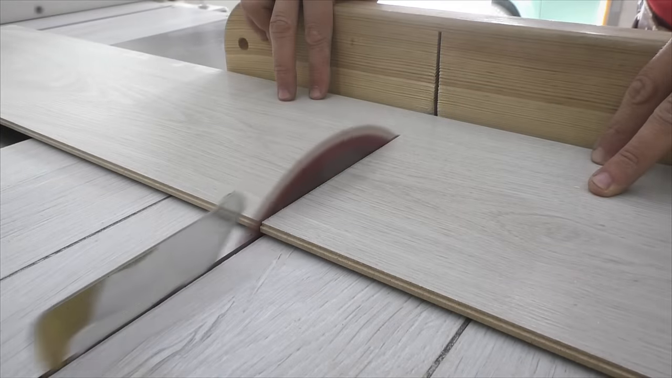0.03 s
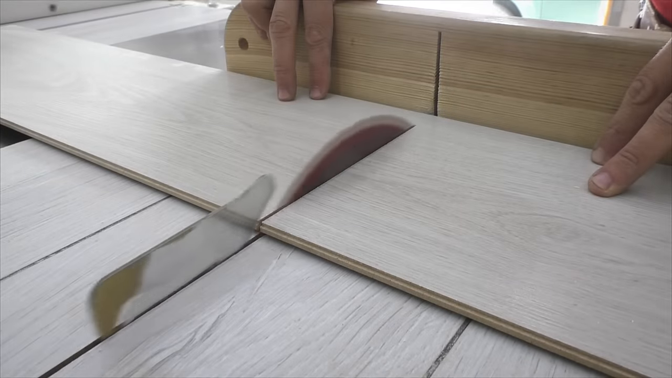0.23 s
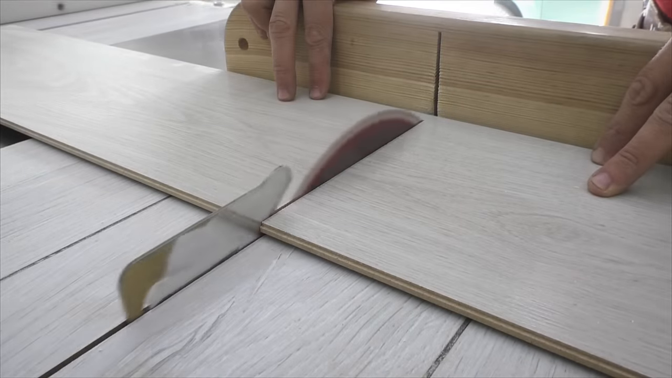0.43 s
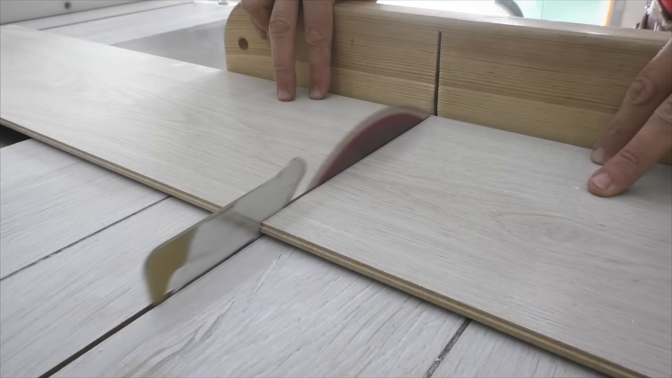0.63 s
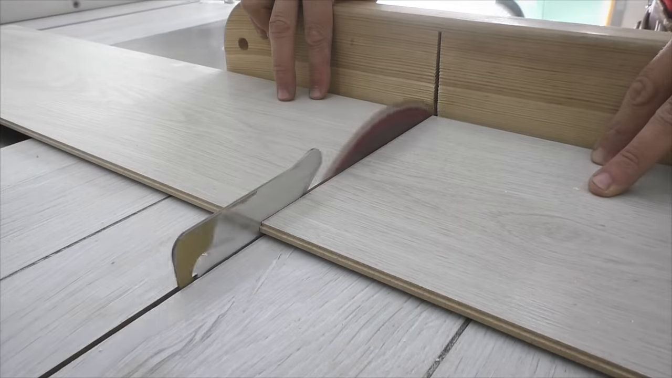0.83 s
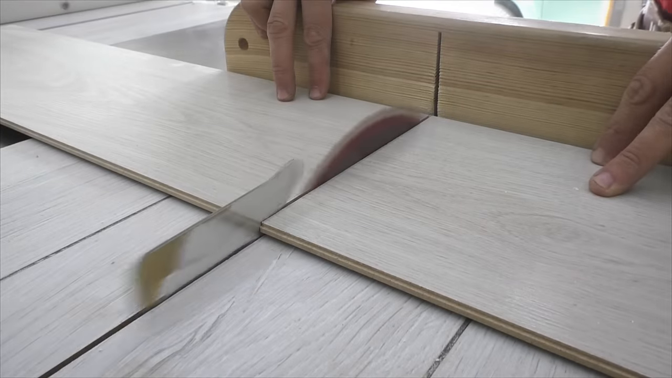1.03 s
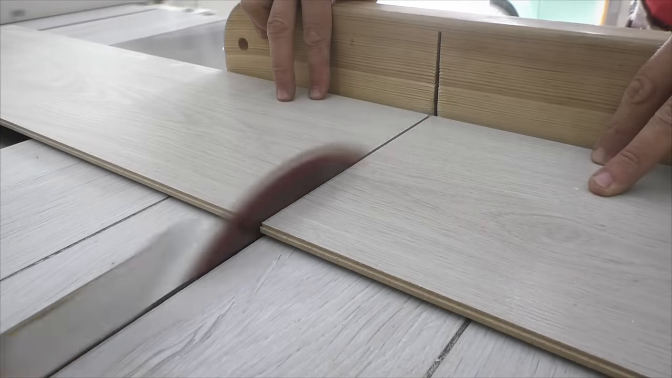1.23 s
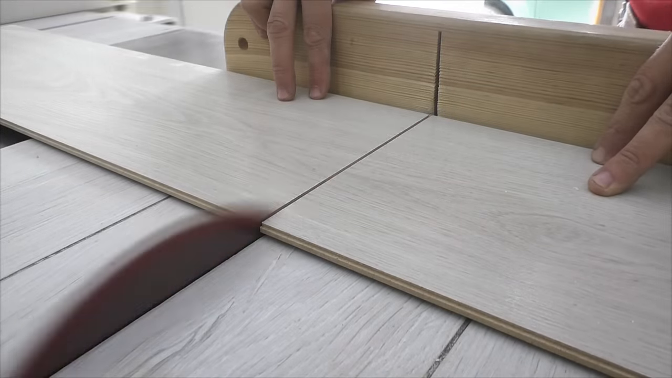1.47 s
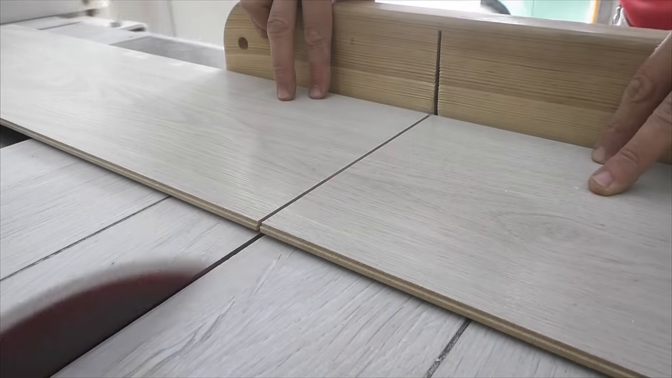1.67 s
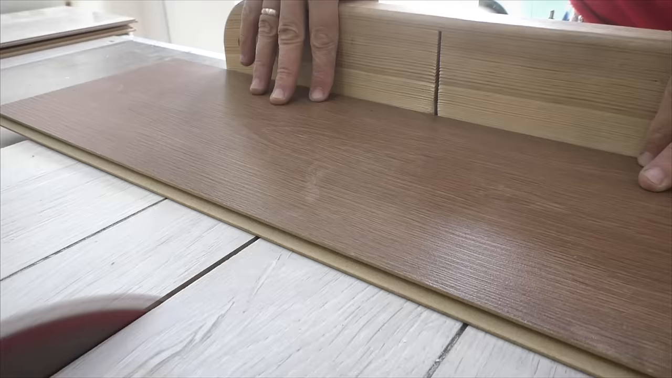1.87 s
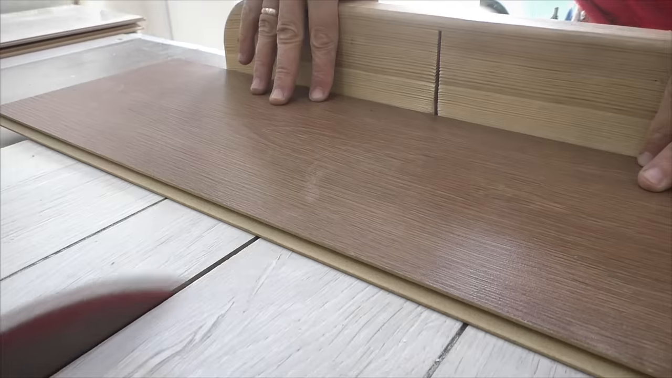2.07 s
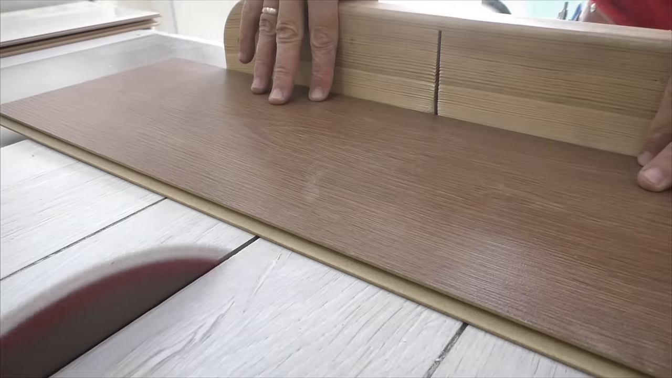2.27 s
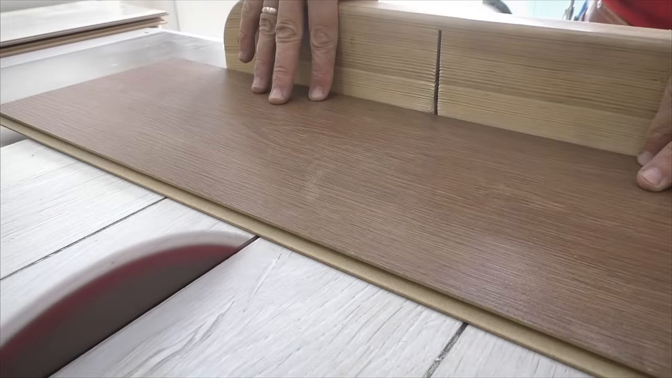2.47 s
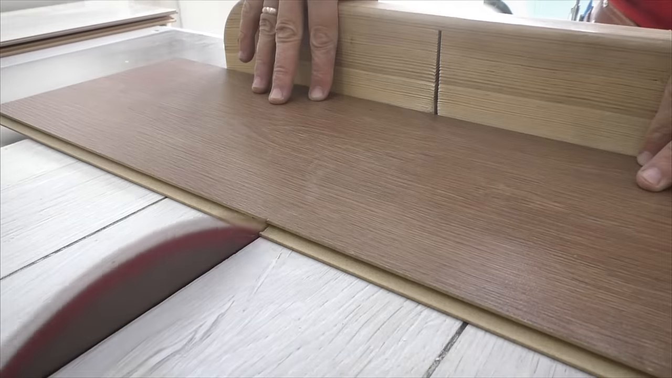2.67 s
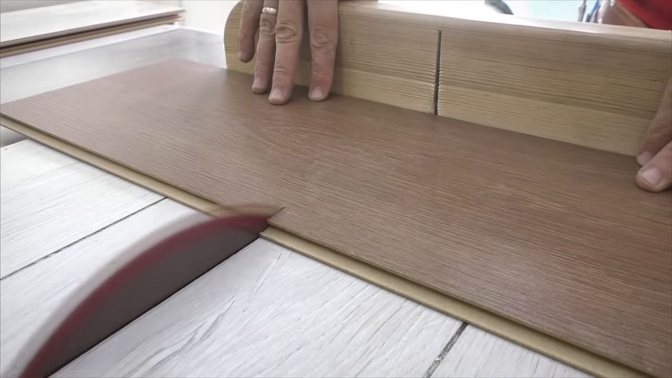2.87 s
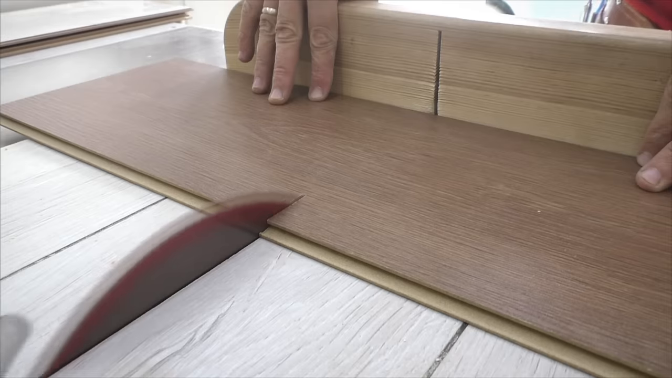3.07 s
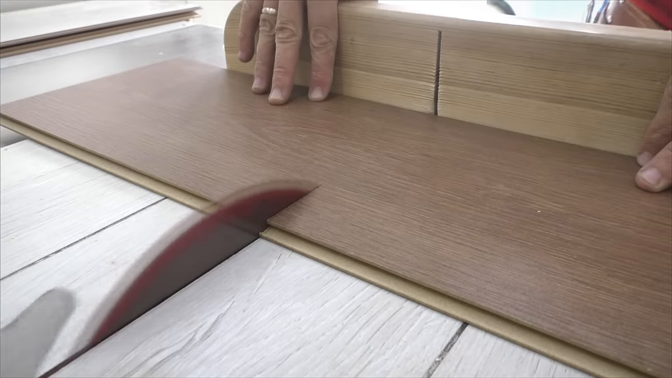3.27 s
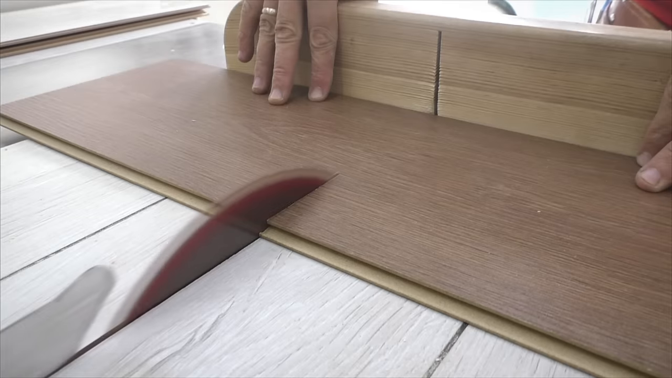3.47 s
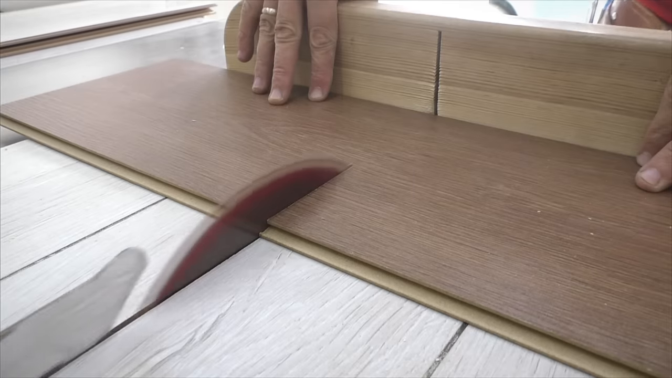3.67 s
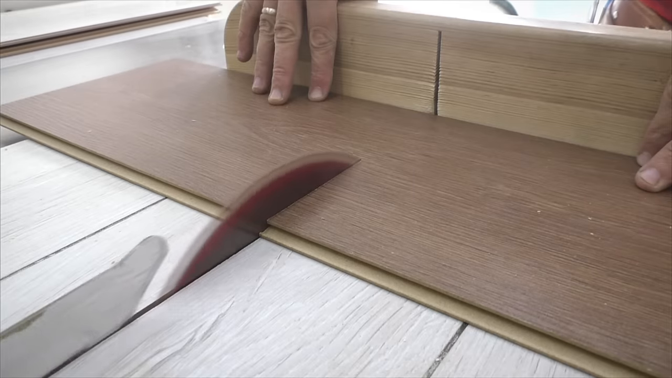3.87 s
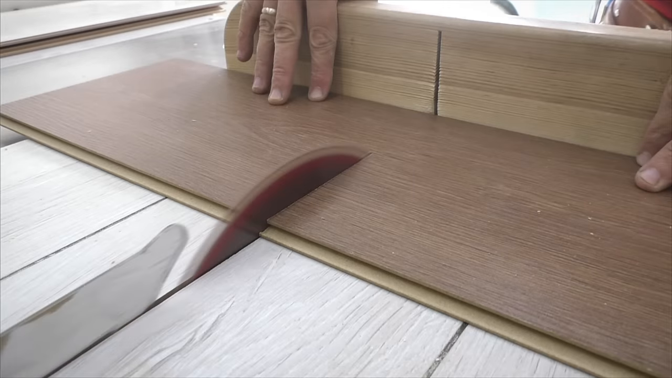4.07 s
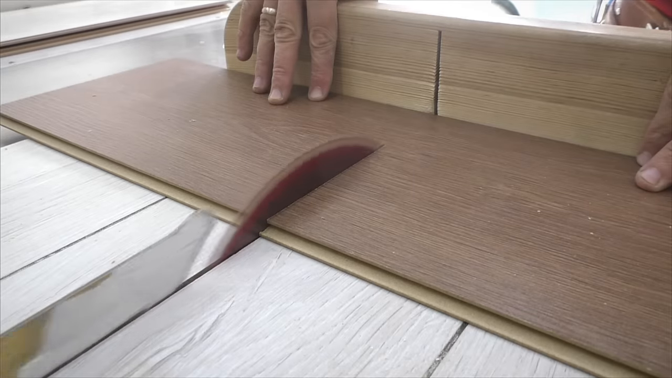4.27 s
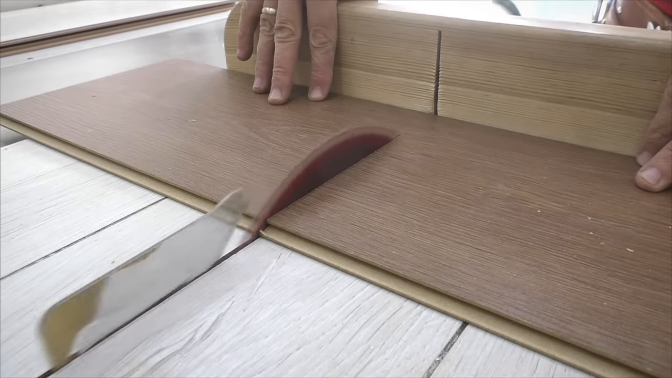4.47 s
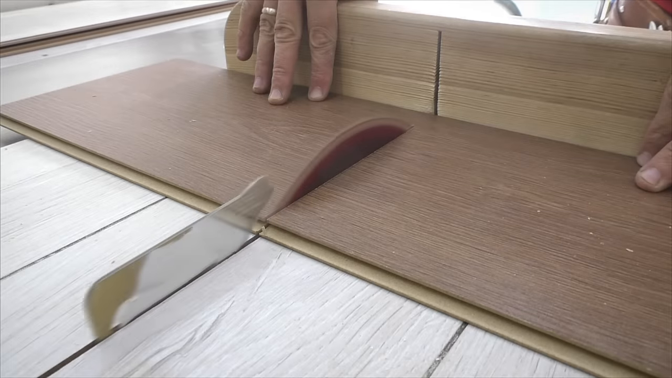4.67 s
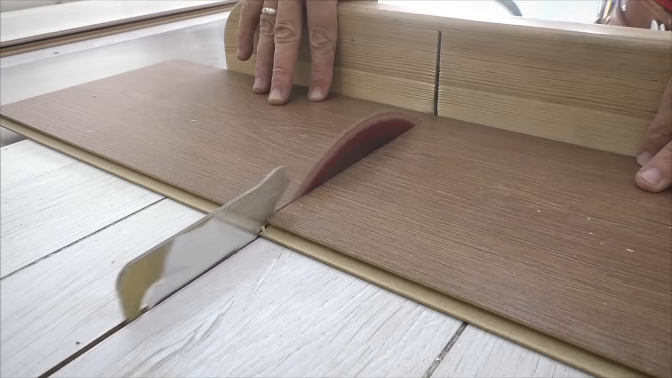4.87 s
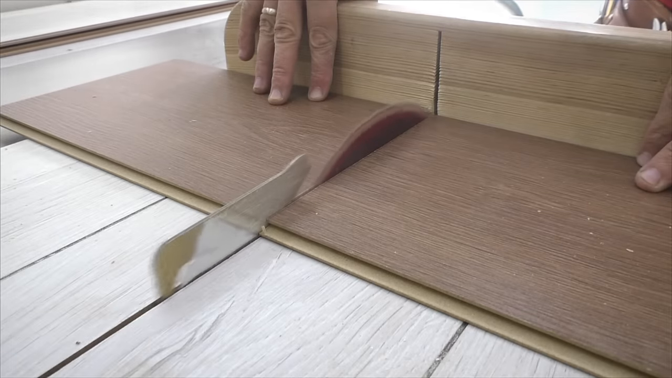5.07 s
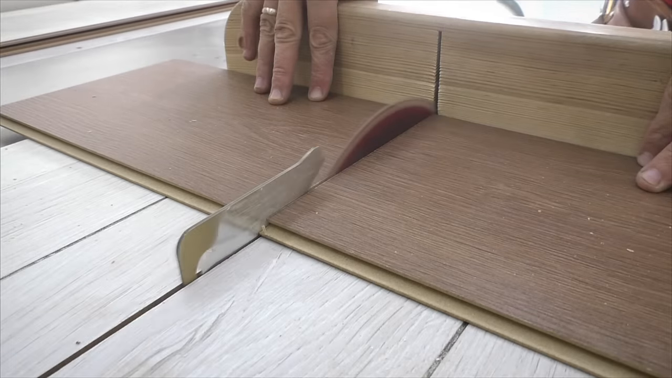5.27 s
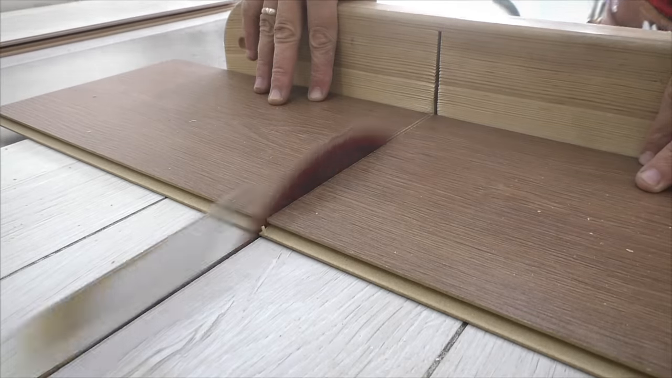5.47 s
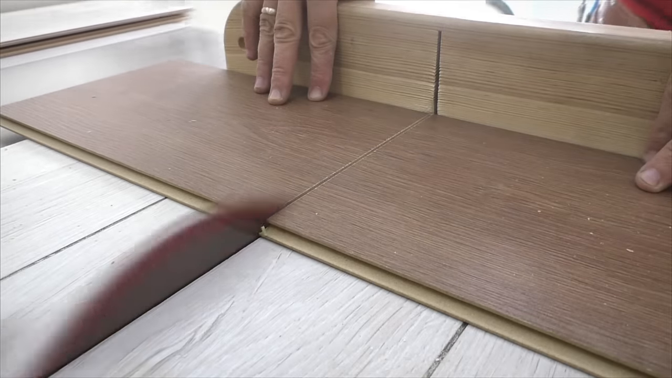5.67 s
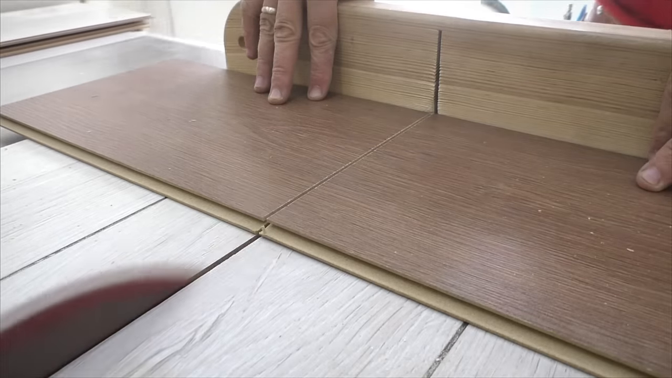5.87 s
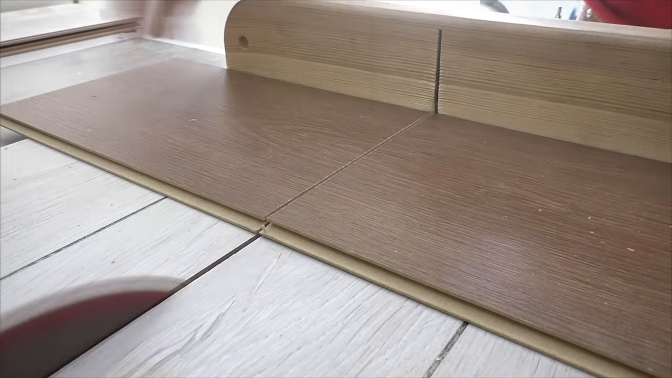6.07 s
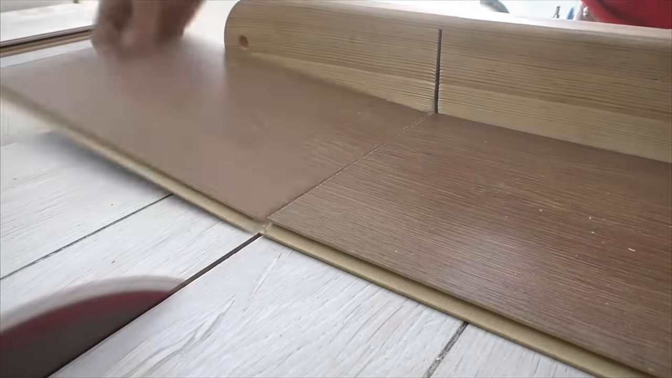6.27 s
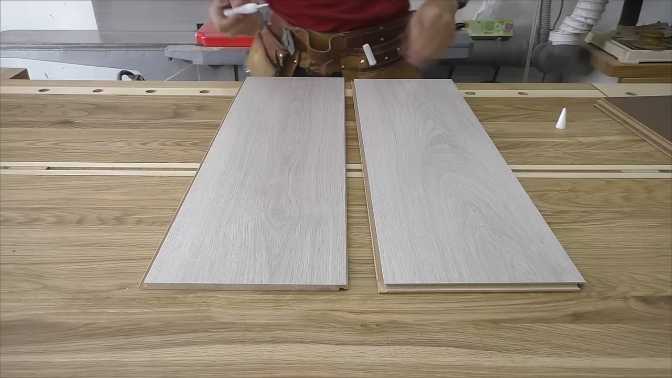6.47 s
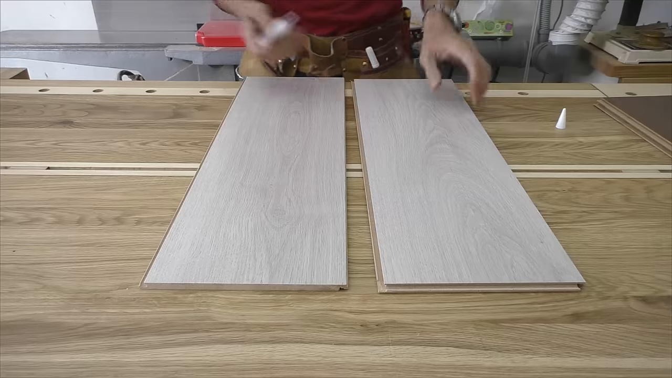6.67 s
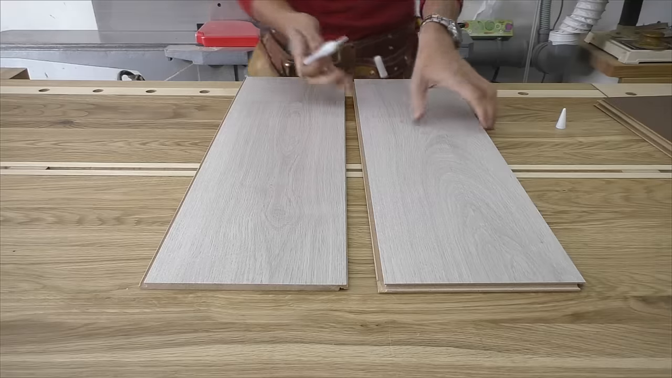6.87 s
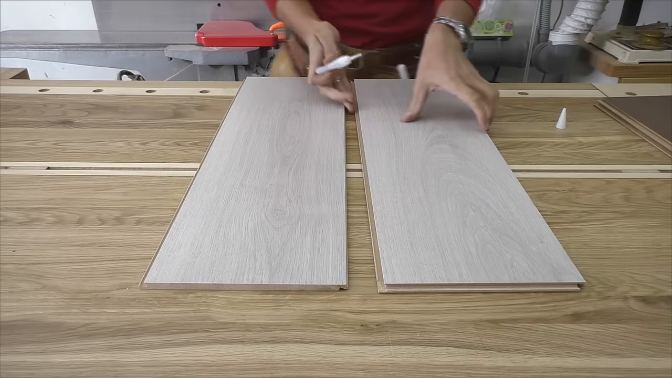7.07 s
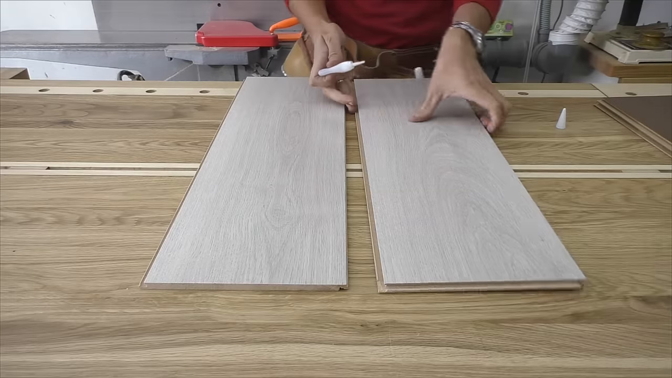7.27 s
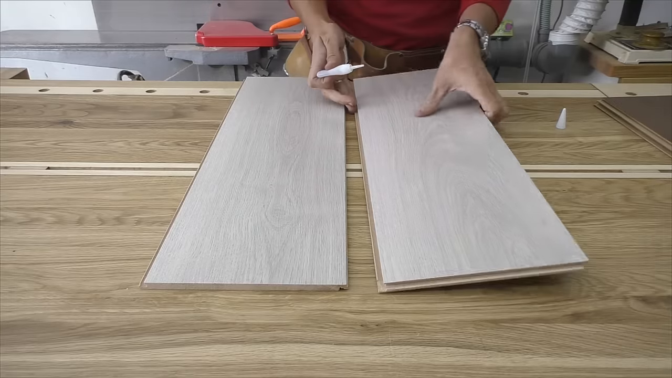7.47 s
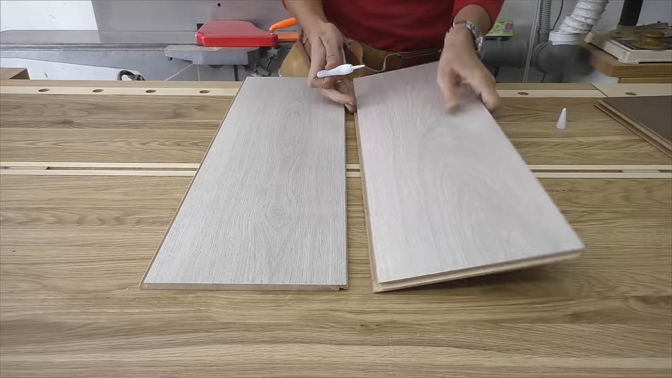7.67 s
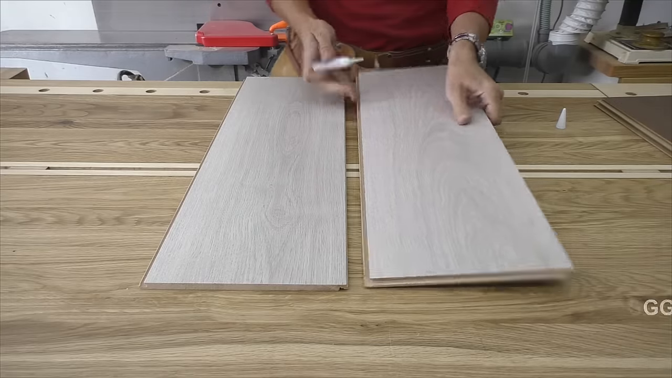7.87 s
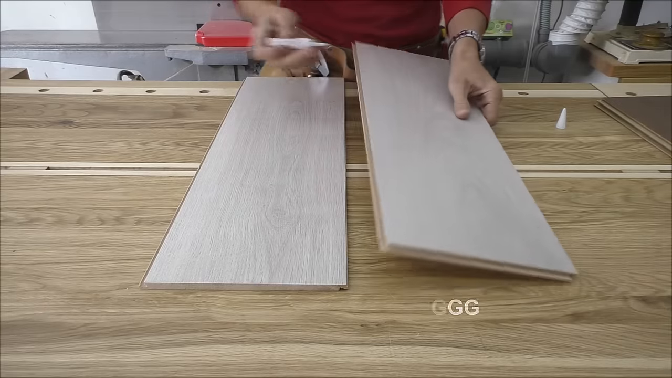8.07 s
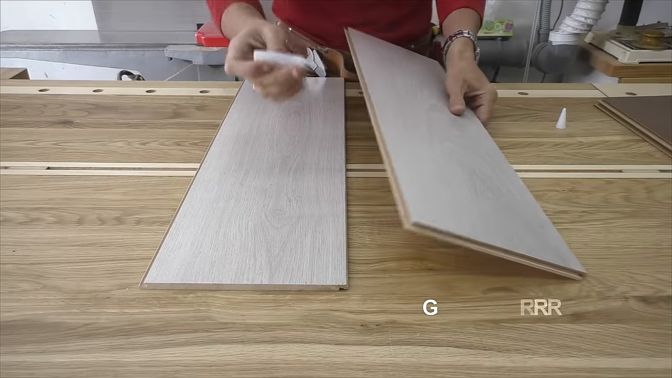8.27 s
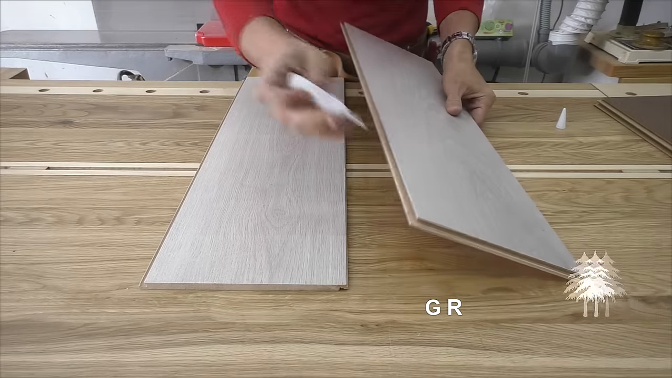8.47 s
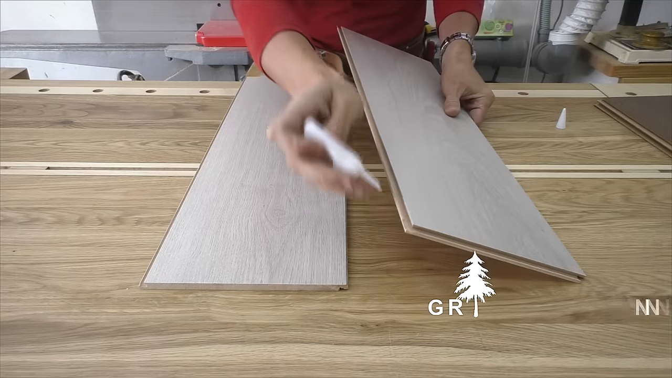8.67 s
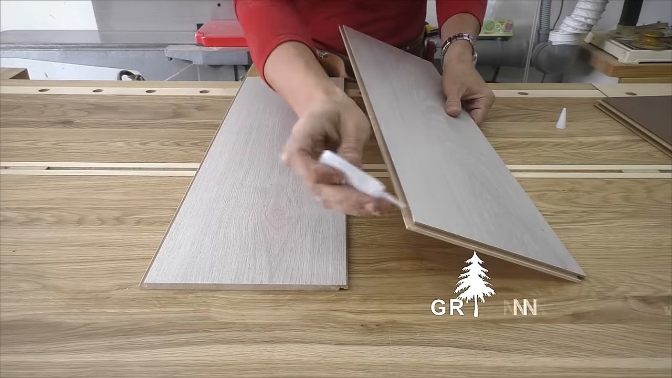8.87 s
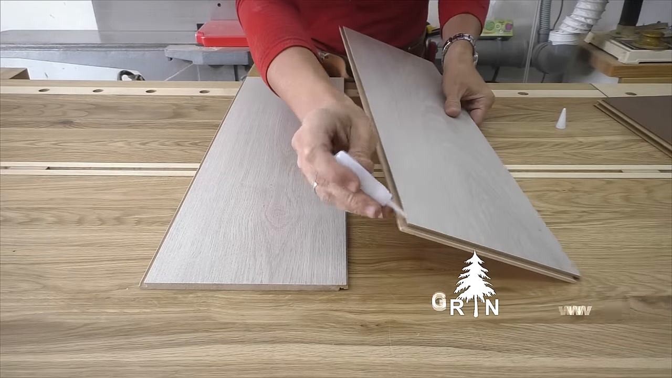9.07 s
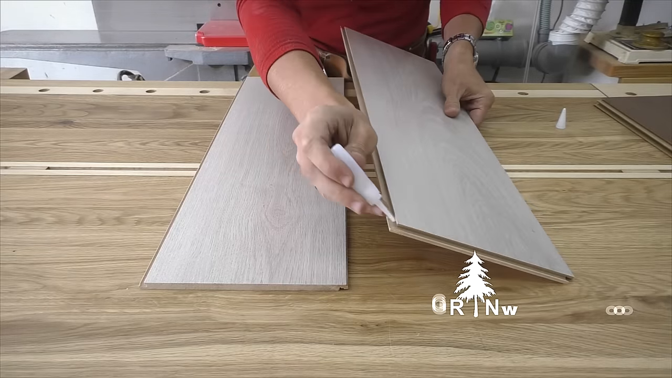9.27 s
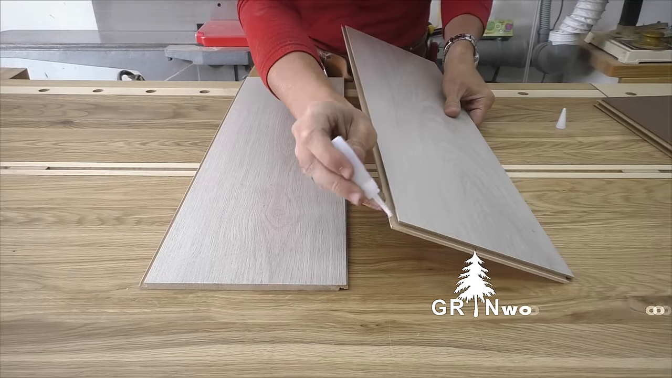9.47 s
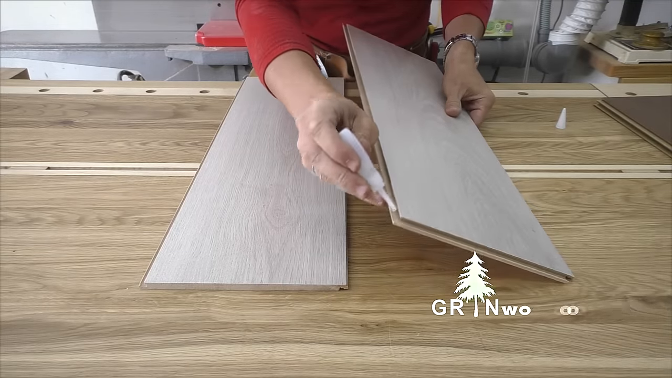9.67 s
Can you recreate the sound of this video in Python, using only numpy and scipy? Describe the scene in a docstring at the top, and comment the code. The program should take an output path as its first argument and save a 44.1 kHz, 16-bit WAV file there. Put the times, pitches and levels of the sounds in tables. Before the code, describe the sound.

Close circular saw whines and rasps through laminate twice, hums between cuts, fades away, then an offcut scuffs and smacks down in a quiet workshop.

```python
"""Table saw and offcut

A 40-tooth table saw, close by, ends one cut through a laminate plank, idles, makes a second cut and fades out.
In the quiet workshop a hand then lifts an offcut, which scuffs the bench and slaps it once.
The saw is tones at multiples of one shaft's rate, plus noise shaped by chips, plank, blade and air, and mains hum.
The offcut is short noise bursts through resonances, plus rubbing noise, with a decaying room answer."""
import sys
import numpy as np
from scipy import signal
from scipy.fft import rfft, irfft, next_fast_len
from scipy.io import wavfile
from scipy.ndimage import uniform_filter1d

SR = 44100
rng = np.random.default_rng(int(sys.argv[2]) if len(sys.argv) > 2 else 0)


def log_audio(samples):
    """Write samples as a 16-bit WAV file to the path given in sys.argv[1]."""
    # one column per channel
    frames = np.atleast_2d(samples).T
    # limit to full scale, then quantise
    limited = np.clip(frames, -1, 1)
    pcm = np.round(limited * 32767).astype(np.int16)
    wavfile.write(sys.argv[1], SR, pcm)


N = 429084  # samples


def amp(db):
    """Decibel law: the gain of a level in dB."""
    return np.exp(np.asarray(db) * (np.log(10) / 20))


def level(gain):
    """Inverse decibel law: the level in dB of a gain."""
    return 20 * np.log10(gain + 1e-9)


def unit(x):
    """Normalization: x at rms 1."""
    return x / np.sqrt(np.mean(x ** 2) + 1e-20)


def noise():
    """White noise: equal power at every frequency."""
    return rng.standard_normal(N)


def along(points, hz):
    """Interpolation of (Hz, value) points on a logarithmic frequency axis."""
    f, v = np.transpose(points)
    return np.interp(np.log(hz + 1), np.log(f + 1), v)


def curves(rows):
    """Linear interpolation in time: a curve for each column, and a gate open inside the table's span."""
    s, *columns = np.transpose(rows)
    t = np.arange(N) / SR
    gate = (t >= s[0]) & (t <= s[-1])
    return [np.interp(t, s, column) for column in columns] + [gate]


def wobble(rate):
    """Random modulation: a curve through normal random knots, rate of them a second."""
    knots = rng.standard_normal(int(N * rate / SR) + 2)
    return np.interp(np.arange(N) * (rate / SR), np.arange(len(knots)), knots)


def swell(peak_s, rise_s, fall_s):
    """Gaussian envelope: 1 at its peak, 1/e at rise_s before it and fall_s after it."""
    bell = np.zeros(N)
    a, b = np.clip([round((peak_s - 3 * rise_s) * SR), round((peak_s + 3 * fall_s) * SR)], 0, N)
    t = np.arange(a, b) / SR - peak_s
    bell[a:b] = np.exp(-(t / np.where(t < 0, rise_s, fall_s)) ** 2)
    return bell


def filtered(x, response):
    """Linear filtering: x times a complex response of frequency."""
    m = next_fast_len(N + SR // 2)
    return irfft(rfft(x, m) * response(np.fft.rfftfreq(m, 1 / SR)), m)[..., :N]


def coloured(x, spectrum):
    """Spectral shaping: x through a curve of (Hz, dB) points, then at rms 1."""
    return unit(filtered(x, lambda hz: amp(along(spectrum, hz))))


def resonant(x, modes):
    """Modal response: parallel resonances (Hz, width Hz, dB) of alternating sign."""
    def response(f):
        total = 0
        for k, (centre, width, db) in enumerate(modes):
            damping = 1j * f * width
            total = total + (-1) ** k * amp(db) * damping / (centre ** 2 - f ** 2 + damping)
        return total
    return filtered(x, response)


def tone(db, phase):
    """Simple harmonic motion: a sine of the given rms level and a random starting phase."""
    return np.sqrt(2) * amp(db) * np.sin(phase + rng.uniform(0, 2 * np.pi))


# spectrum of the quiet workshop: frequency_hz, relative level_db
SHOP_SPECTRUM = [(15, -48), (25, -22.5), (122, -2), (215, -12), (234, -8), (470, -12.5), (568, -8),
                 (764, -17.5), (2300, -15), (4400, -33), (15600, -47.5)]


def workshop_floor():
    """Ambient noise: random pressure with a fixed spectrum and a slightly wandering level."""
    return amp(-62 + .8 * wobble(16)) * coloured(noise(), SHOP_SPECTRUM)


# reverberation of the workshop: frequency_hz, t60_s
ROOM_DECAY = [(150, 0.97), (700, 0.53), (2000, 0.57), (4000, 0.55), (8000, 0.37), (14000, .25)]


def room(x):
    """Reverberation: convolution with noise in which each frequency decays at its own speed."""
    hz, t, z = signal.stft(rng.standard_normal(SR), SR, nperseg=256)
    decaying = z * amp(-60 * t / along(ROOM_DECAY, hz)[:, None])
    tail = signal.istft(decaying, SR, nperseg=256)[1]
    delayed = np.pad(x, (300, 0))  # samples
    return signal.fftconvolve(delayed, tail / np.linalg.norm(tail))[:N]


# hands and plank sliding: peak_s, rise_s, fall_s, level_db (before a common +1 dB)
SCUFFS = [(7.402, 0.0089, .04, -56.5), (7.466, 0.012, 0.0058, -45), (7.626, .06, 0.0092, -52.5),
          (7.776, 0.075, 0.14, -55.5), (8.017, 0.065, 0.0036, -43), (8.3, .02, 0.122, -60),
          (9.01, .02, 0.038, -74), (9.206, 0.063, 0.056, -68.5)]
# spectrum of the sliding: frequency_hz, relative level_db
RUB_SPECTRUM = [(410, -33), (700, -9.5), (1010, -4), (1510, -10.5), (2670, -4), (3640, -11.5), (5590, -17),
                (15600, -42.5)]


def rubbing():
    """Friction noise: rough, fast-wavering noise swells with each slide."""
    sliding = sum(amp(db + 1.0) * swell(s, rise, fall) for s, rise, fall, db in SCUFFS)
    return sliding * coloured(amp(2.7 * wobble(200)) * noise(), RUB_SPECTRUM)


# plank contacts: start_s, level_db, then against it knock_db, slap_db, crack_db, thud_db (before fixed trims)
CONTACTS = [(7.407, -42, -15, -9, -26, -19.5), (7.463, -23, -11, -18, -20.5, -10.5),
            (7.549, -51, -30, -27, -3, -30.5), (7.59, -44, -16, -10, -13, -6),
            (7.616, -36, -19.5, -10, -18, -11.5), (7.684, -49.5, -19.5, -13.5, -8.5, -24.5),
            (7.922, -46, -26.5, -13.5, -8.5, -29.5), (7.961, -34.5, -19, -10, -14, -23),
            (8.025, 0, -9, -4.5, -36, -24.5), (8.119, -15, -6, -13, -47, -28),
            (8.411, -36.5, -8.5, -13.5, -14.5, -9), (8.444, -46, -10, -13, -23, -9),
            (8.862, -48, -6, -11, -29.5, -23), (9.341, -49, -8.5, -13, -29, -18.5),
            (9.379, -55, -9, -11, -24.5, -11)]
# bending modes of the plank, the hollow knock: frequency_hz, width_hz, level_db
HOLLOW_MODES = [(550, 290, -9.5), (776, 58, 2.5), (1042, 29, 4.5), (1310, 200, -7)]
# hard face of the plank, the bright slap: frequency_hz, width_hz, level_db
FACE_MODES = [(1830, 600, 5.5), (3000, 1340, 0), (4370, 1300, -9)]
# the bench, the low thud: frequency_hz, width_hz, level_db
BENCH_MODES = [(111, 120, -2.5), (182, 45, 6), (284, 92, 1.5), (437, 56, 1)]


def plank_contacts():
    """Impact excitation: each contact drives knock, slap, crack and thud in its own mix."""
    blows, t = np.zeros((4, N + SR)), np.arange(SR // 20) / SR
    landing = 1 - np.exp(-t / 0.0014)  # the face meets the bench bit by bit
    for s, db, knock_db, slap_db, crack_db, thud_db in CONTACTS:
        # each part: its level, a trim in dB, and a decay given by the time to fall 60 dB
        fall_db = np.array([knock_db + 21.0 - 60 * t / 0.057,
                            slap_db + 15.0 - 60 * t / 0.024,
                            crack_db + 6.0 - 60 * t / .025,
                            thud_db + 19 - 60 * t / 0.058])
        fall = landing * amp(db + fall_db)
        z = rfft(fall * rng.standard_normal(fall.shape))
        # a blow pushes all frequencies evenly; the colour comes from the wood
        smooth = np.sqrt(uniform_filter1d(np.abs(z) ** 2, size=11))
        even = z * np.linalg.norm(fall, axis=1)[:, None] / smooth
        fade_out = np.cos(np.pi / 2 * t / t[-1])
        blows[:, round(s * SR):][:, :len(t)] += irfft(even, len(t)) * fade_out
    knock, slap, edge, thud = blows[:, :N]

    def sharp(hz):
        """Band-pass response: second-order slopes at 4 and 10 kHz."""
        return (1j * hz / 4000) ** 2 / (1 + 1j * hz / 4000) ** 2 / (1 + 1j * hz / 10000) ** 2
    crack = filtered(edge, sharp)
    return resonant(knock, HOLLOW_MODES) + resonant(slap, FACE_MODES) + resonant(thud, BENCH_MODES) + crack


# spectrum of the air noise: frequency_hz, relative level_db
AIR_SPECTRUM = [(15, -76.5), (25, -15), (96, -16), (148, -9), (199, -12.5), (331, -19.5), (1210, -24),
                (2500, -8), (2710, -6.5), (4050, -16), (5030, -21.5), (5450, -22.5), (5910, -27.5),
                (10700, -36), (15600, -66)]


def air_noise():
    """Broadband flow noise: shaped noise with a slightly wandering level."""
    return amp(-33 + 0.74 * wobble(12)) * coloured(noise(), AIR_SPECTRUM)


# the free machine, louder while the blade runs back through the kerf:
# time_s, mains_hum_db, tooth_tone_db, second_harmonic_db
MACHINE_LEVELS = [(0, -33.5, -35, -45), (.6, -35.5, -35, -45), (.78, -31, -36, -45),
                  (1.0, -31.5, -35, -47.5), (1.13, -30.5, -25, -55), (1.3, -31, -27.5, -55),
                  (1.5, -30.5, -28, -39.5), (1.65, -31.5, -30, -45.5), (1.9, -35.5, -34, -40.5),
                  (2.3, -34.5, -33.5, -42.5), (2.55, -34.5, -32.5, -49), (2.8, -38, -32, -45),
                  (3.6, -34.5, -32, -45), (4.75, -32, -32, -45), (4.9, -35.5, -30, -45),
                  (5.15, -32.5, -31, -42), (5.45, -32, -28, -47), (5.7, -32.5, -30.5, -49),
                  (5.9, -36, -36, -41), (6.6, -35, -32.5, -41), (7.36, -35.5, -34, -40)]


def motor_hum():
    """Mains hum: a 99.8 Hz tone with its octave and fourfold, phases wandering together."""
    hum_db = curves(MACHINE_LEVELS)[0]
    mains = 2 * np.pi * 99.8 * np.arange(N) / SR + 0.17 * wobble(6.2)
    octave = tone(-43.5 + 0.54 * wobble(6), 2 * mains)
    fourfold = tone(-56 + 1.7 * wobble(6), 4 * mains)
    return tone(hum_db, mains) + octave + fourfold


# the shaft labours: peak_s, length_s (each side), level_db
SHAFT_THROBS = [(0.181, 0.056, -46), (.54, 0.11, -40), (2.68, .05, -48), (4.35, .12, -52.5),
                (4.874, 0.093, -38.5)]


def throb_level():
    """Superposition: the level in dB of the once-a-turn tone, swelling above a -65 dB rest."""
    return level(amp(-65) + sum(amp(db) * swell(s, length, length) for s, length, db in SHAFT_THROBS))


# the load slows the blade: time_s, tooth_rate_hz
TOOTH_RATE = [(0, 2657.5), (.3, 2664.5), (.65, 2672), (.85, 2680.5), (1.1, 2676), (1.4, 2681), (2.5, 2680),
              (2.62, 2676.5), (2.8, 2668), (3.4, 2668), (4, 2670.5), (4.3, 2666), (4.6, 2666), (5.06, 2671),
              (5.2, 2680), (5.5, 2681), (7.36, 2679.5)]
TEETH = 40


def rotation():
    """Phase is the integral of frequency: the tooth phase, and the shaft phase TEETH times slower."""
    tooth = 2 * np.pi * np.cumsum(curves(TOOTH_RATE)[0]) / SR
    return tooth, tooth / TEETH


# the returning blade brushes the kerf wall: peak_s, length_s (fall; rise a third), chip_hiss_db (before
# the chips' +4 dB), whine_db of the 2nd harmonic (before the harmonic offsets)
KERF_GRAZES = [(.88, 0.054, -47, -52), (1.054, 0.034, -32, -23.5), (1.11, .03, -44, -45),
               (1.164, 0.024, -46, -42), (1.5, 0.03, -50.5, -52), (1.576, .025, -47, -34.5),
               (5.181, 0.023, -47.5, -41), (5.265, 0.035, -46.5, -54), (5.403, 0.024, -43.5, -48),
               (5.628, .015, -49, -49), (5.722, .03, -44, -55)]


def grazes():
    """Intermittent contact: the touch, hiss gain and whine gain of the brushes in time."""
    brush = [swell(s, length / 3, length) for s, length, _, _ in KERF_GRAZES]
    hiss = sum(amp(row[2]) * b for row, b in zip(KERF_GRAZES, brush))
    whine = sum(amp(row[3]) * b for row, b in zip(KERF_GRAZES, brush))
    return sum(brush), hiss, whine


# the free tooth tone dips: peak_s, length_s (each side)
TONE_DIPS = [(0.817, 0.028), (1.03, 0.032), (1.19, 0.031), (1.41, 0.049), (2.287, 0.12), (5.51, 0.038),
             (5.66, 0.049), (5.93, 0.04)]
# harmonics 3 to 5 of the free blade: level_db
IDLE_WHINE = [-59.5, -60, -69.5]
# harmonics 1 to 5 of a graze, against its whine_db: offset_db
GRAZE_HARMONICS = [-17, -0.5, -8, -11, -21]
# one table a cut: time_s, tooth_tone_db, second_db, third_db, fourth_db (its harmonics)
CUT_WHINE = [
    [(0, -24, -22.5, -42, -41.5), (.18, -32.5, -30, -28.5, -44), (.35, -23, -20.5, -39, -37.5),
     (.45, -22.5, -22.5, -37, -36), (.55, -22.5, -22, -27.5, -32), (.63, -35.5, -16.5, -20.5, -30),
     (.69, -41, -29.5, -30.5, -35.5), (.76, -39.5, -26, -33.5, -40), (.81, -48, -54, -56, -60)],
    [(2.55, -37, -44, -55, -66), (2.58, -28.5, -26, -44.5, -28.5), (2.68, -24, -30, -24, -30.5),
     (2.78, -21.5, -33.5, -34.5, -34), (3.01, -21.5, -38.5, -33, -42), (3.09, -24.5, -34, -49, -32),
     (3.22, -23.5, -51, -39, -53.5), (3.4, -28.5, -31, -34, -42), (3.5, -28, -44.5, -54, -41),
     (3.71, -25.5, -33, -53, -33.5), (3.89, -29.5, -33.5, -41, -36.5), (4.14, -30, -37, -46, -35),
     (4.41, -26, -22, -37, -32), (4.57, -31, -34, -47, -43), (4.78, -24.5, -22, -39, -36),
     (4.9, -22.5, -22, -43.5, -29), (4.98, -20.5, -32, -36, -44), (5.08, -20.5, -27, -37, -28.5),
     (5.13, -31, -40.5, -42, -47)],
]


def tooth_whine(tooth, graze):
    """Harmonic series: five wavering multiples of the tooth rate, at idle, cutting or graze levels."""
    _, idle_db, second_db, _ = curves(MACHINE_LEVELS)
    idle_db = idle_db - 12.5 * sum(swell(s, length, length) for s, length in TONE_DIPS)
    upper_db = [np.full(N, db) + 2.2 * wobble(5) for db in IDLE_WHINE]
    whine_db = np.array([idle_db, second_db] + upper_db)
    for cut in CUT_WHINE:
        *cut_db, cutting = curves(cut)
        fifth_db = cut_db[-1] - 9 + 2.5 * wobble(8)
        whine_db = np.where(cutting, cut_db + [fifth_db], whine_db)
    whine_db = level(amp(whine_db) + graze * amp(GRAZE_HARMONICS)[:, None])
    return sum(tone(db + 2.0 * wobble(30), k * tooth + 0.16 * wobble(40))
               for k, db in enumerate(whine_db, start=1))


# blade flutter in the kerf, one list a cut: shaft_order, peak_s, length_s (each side), level_db
KERF_FLUTTER = [
    [(6, 0.35, 0.24, -39.5), (13, .2, .14, -35.5), (20, 0.19, 0.29, -38), (20, .55, 0.029, -37),
     (36, 0.53, .22, -33), (39, 0.11, 0.25, -34.5), (39, .55, 0.22, -31), (44, .2, .3, -37),
     (46, .08, 0.12, -27.5), (62, 0.051, .15, -31.5), (100, 0.68, .07, -35.5), (100, .25, .1, -42)],
    [(6, 4.14, 0.15, -42), (6, 4.9, 0.3, -47), (20, 2.96, 0.77, -39), (20, 4.29, 0.74, -30),
     (26, 2.864, 0.47, -25), (26, 3.794, 0.59, -22.5), (32, 3, 0.59, -31.5), (32, 4.8, 0.63, -33),
     (39, 2.64, .08, -29), (36, 3.3, .5, -35), (39, 3.2, .6, -32), (39, 4.9, .2, -27),
     (46, 4.12, 0.84, -36), (52, 2.3, 0.46, -26.5), (52, 4.63, 0.22, -33), (54, 3.3, 0.82, -43),
     (54, 3.5, 0.75, -49), (60, 4.91, .2, -36), (61, 5.3, .2, -38), (41, 4.95, .15, -32),
     (100, 5.03, .1, -38), (76, 3.9, .4, -40)],
]


def blade_flutter(shaft, load):
    """Order excitation: multiples of the shaft rate swell and die while the teeth are in the wood."""
    gains = {}
    for cut, rows in zip(CUT_WHINE, KERF_FLUTTER):
        cutting = curves(cut)[-1]
        for order, s, length, db in rows:
            gain = cutting * amp(db) * swell(s, length, length)
            gains[round(order)] = gains.get(round(order), 0) + gain
    orders = sum(gain * tone(1.8 * wobble(10), order * shaft + .3 * wobble(12))
                 for order, gain in gains.items())
    entry = 1 - swell(2.58, .2, 0.041)  # at 2.58 s the teeth enter the plank; flutter grows after it
    return load * entry * orders


# response of plank and teeth to a bite: frequency_hz, relative level_db
BITE_SPECTRUM = [(60, -24), (300, -13.5), (600, -21), (1000, -18), (1500, -14), (2500, 4.5), (3500, -5),
                 (5000, -2.5), (8000, -12.5), (15000, -11.5)]


def uneven_bites(shaft, clicks):
    """Amplitude modulation: tooth clicks sized by a shaft-order pattern, answered by the clamped plank."""
    # teeth differ in height: a pattern that drifts as the plank moves and nearly repeats each half turn
    pattern = sum(tone(4 * wobble(4) - 5 * (k % 2), k * shaft + .5 * wobble(3))
                  for k in range(1, TEETH // 2))
    # the plank answers each shaft order at its own strength
    t = np.arange(SR // 20) / SR
    board = rng.standard_normal(len(t)) * amp(-60 * t / 0.028)
    return coloured(signal.fftconvolve(pattern * clicks, board)[:N], BITE_SPECTRUM)


# spectrum of the chip hiss: frequency_hz, relative level_db
CHIP_SPECTRUM = [(880, -52), (1500, -17), (2260, -12), (2620, -9), (2810, -6), (3800, -20), (5520, -13),
                 (6270, -13.5), (11100, -12.5), (15600, -17.5)]


def chip_hiss(hiss_db):
    """Random impacts: shaped noise, flickering fast, at the chip level plus 4 dB."""
    flying = amp(1.0 * wobble(900)) * noise()
    return amp(hiss_db + 4.0 + 1.1 * wobble(8.8)) * coloured(flying, CHIP_SPECTRUM)


# spectrum of the plank body: frequency_hz, relative level_db
BODY_SPECTRUM = [(130, -36.5), (220, -20), (339, -12.5), (873, -11.5), (948, -9), (1140, -9), (1310, -7.5),
                 (1600, -12), (2080, -30), (3520, -120)]


def plank_body(body_db):
    """Forced vibration: shaped noise for the plank driven by the cut."""
    return amp(body_db + 1.7 * wobble(8)) * coloured(noise(), BODY_SPECTRUM)


# modes of the blade: frequency_hz, width_hz, relative level_db
BLADE_MODES = [(255.3, 4.6, -6), (971, 17, -9.5), (1206, 11, -14.5), (1640, 25, -8), (2000, 30, -13.5),
               (2401, 10, 4), (2594, 120, -9), (2940, 40, -9.5), (5020, 68, -17), (4097, 260, -13)]


def blade_ring(ring_db, load):
    """Modal resonance: noise rings the blade's modes while the teeth touch wood."""
    return load * amp(ring_db + 3.0 * wobble(14)) * unit(resonant(noise(), BLADE_MODES))


# how hard the teeth work the wood: time_s, chip_hiss_db (before +4 dB), bite_db (before -2.5 dB),
# body_db, ring_db; bites and ring are gated by load, and all four are swung by the blade's runout
TOOTH_WORK = [(0, -31.5, -20.5, -45, -33), (.15, -30, -18.5, -37, -32.5), (.4, -31.5, -23.5, -36.5, -32),
              (.63, -32, -21.5, -40, -33), (.7, -27, -25.5, -37, -32.5), (.8, -45.5, -26.5, -53, -40),
              (1.0, -47.5, -31.5, -51, -44.5), (1.2, -47, -29, -50, -30.5), (1.5, -51, -39, -48.5, -38),
              (1.8, -54.5, -40, -65, -44.5), (2.56, -52, -49, -60, -50), (2.6, -29.5, -29.5, -57, -37),
              (2.8, -32, -25, -38.5, -31.5), (3.3, -30.5, -30, -39.5, -27), (3.9, -32, -22, -39, -31.5),
              (4.35, -30.5, -24, -39.5, -29.5), (4.9, -33.5, -24, -38.5, -32),
              (5.08, -34.5, -20.5, -45, -36), (5.14, -38.5, -37, -39.5, -40), (5.35, -50.5, -34, -69, -44),
              (6, -53.5, -34, -62, -45.5), (7.36, -53.5, -38, -66, -47)]


def saw():
    """Synchronous machine noise: whine, flutter, bites and runout share one shaft phase."""
    tooth, shaft = rotation()
    touch, graze_hiss, graze_whine = grazes()
    work_db, bite_db, body_db, ring_db, _ = curves(TOOTH_WORK)
    hiss_db = level(amp(work_db) + graze_hiss)
    load = np.clip((hiss_db + 54) / 12, 0, 1)  # teeth touch wood only while chips fly
    # a click per tooth; whatever sizes the clicks shows as sidebands of every tooth tone
    clicks = 1 + 2 * sum(np.cos(k * tooth) for k in range(1, 6))
    flutter = blade_flutter(shaft, load)
    sidebands = amp(-26) * filtered(flutter * (clicks - 1), lambda hz: hz > 3000)
    # a blade that runs out of true bites harder once a turn, most when the shaft throbs;
    # a graze touches once a turn, adding up to 3 dB of swing
    throb_db = throb_level()
    swing_db = np.clip((throb_db + 56) / 5, 0, 6) + 3 * np.clip(touch, 0, 1)
    runout = amp(swing_db * np.cos(shaft))
    bites = load * amp(bite_db - 2.5) * uneven_bites(shaft, clicks)
    cutting = runout * (bites + blade_ring(ring_db, load) + chip_hiss(hiss_db) + plank_body(body_db))
    machine = air_noise() + motor_hum() + tone(throb_db, shaft)
    fade_s, silent_s = 6.823, 7.365
    fade = np.clip((silent_s - np.arange(N) / SR) / (silent_s - fade_s), 0, 1) ** 0.99
    return fade * (tooth_whine(tooth, graze_whine) + flutter + sidebands + cutting + machine)


def scene():
    """Superposition: floor, handled offcut with its reverberation, and saw, the same in both channels."""
    handling = plank_contacts() + rubbing()
    mix = workshop_floor() + handling + amp(-6) * room(handling) + saw()
    return np.tile(mix, (2, 1))


def record(dry):
    """Saturation and band limiting: soft overload near full scale, then nothing from 15730 Hz up."""
    overloaded = dry / (1 + np.abs(dry) ** 6) ** (1 / 6)
    return filtered(overloaded, lambda hz: hz < 15730)


dry = scene()
out = record(dry)
log_audio(out)
```